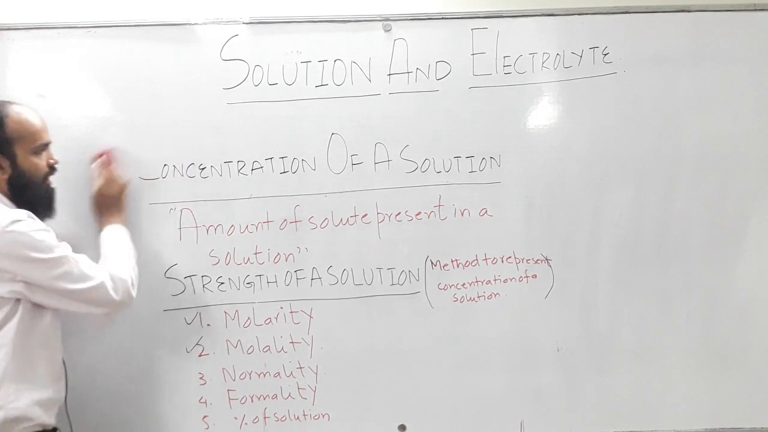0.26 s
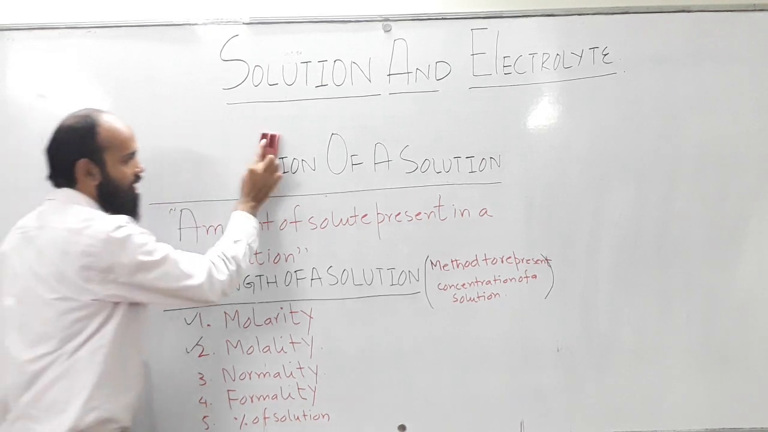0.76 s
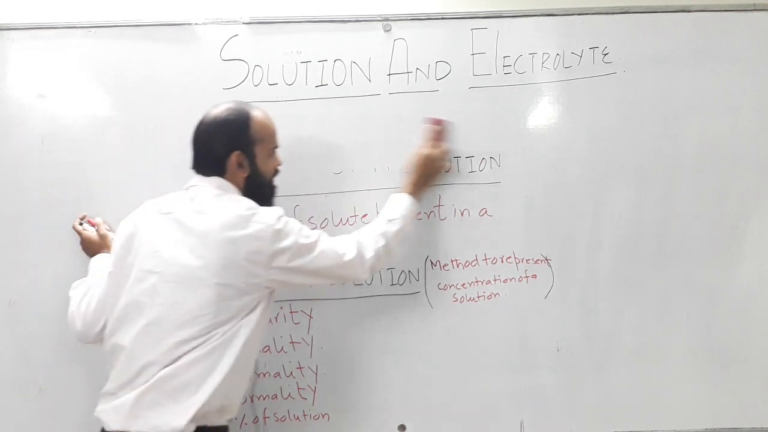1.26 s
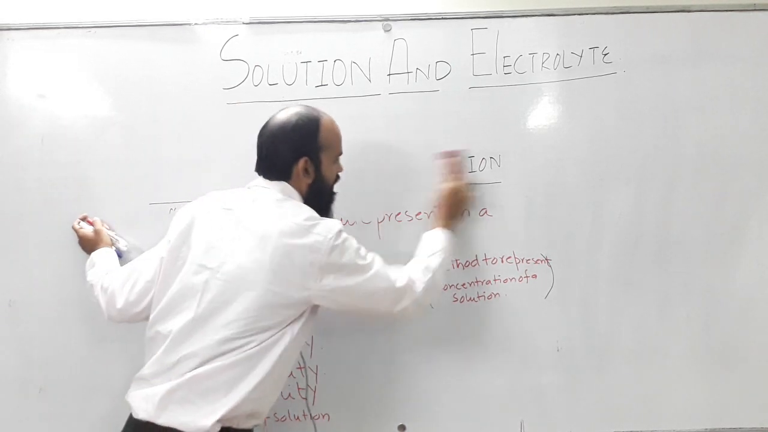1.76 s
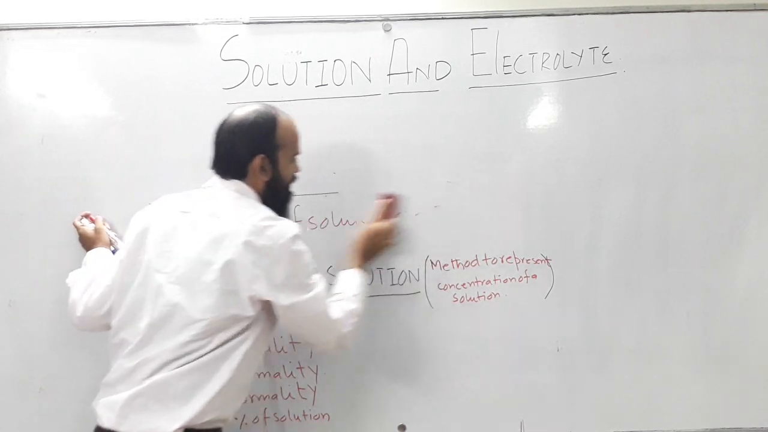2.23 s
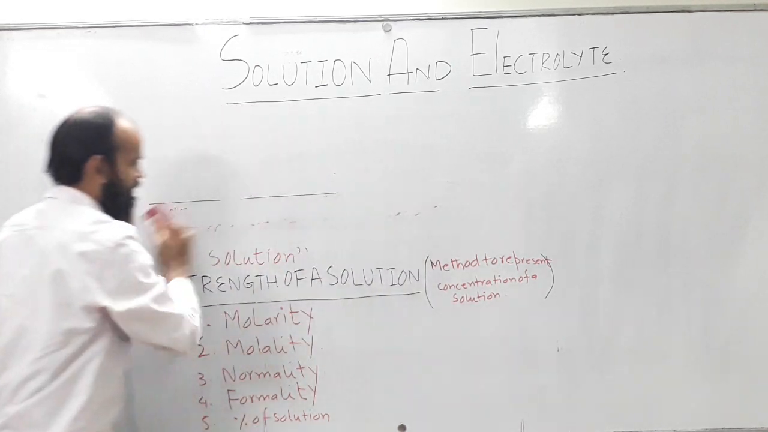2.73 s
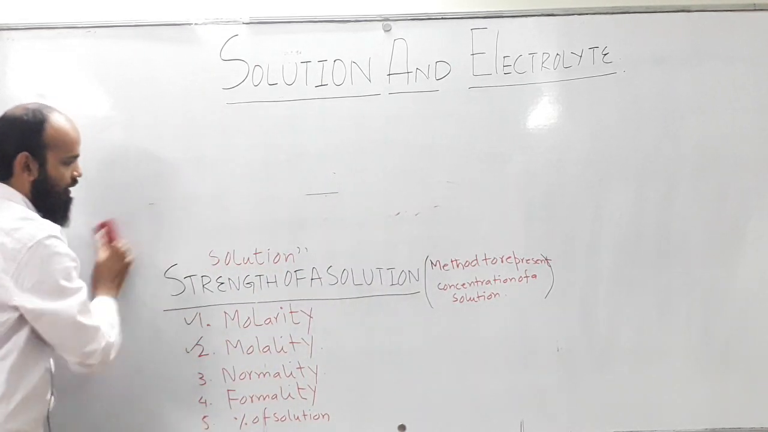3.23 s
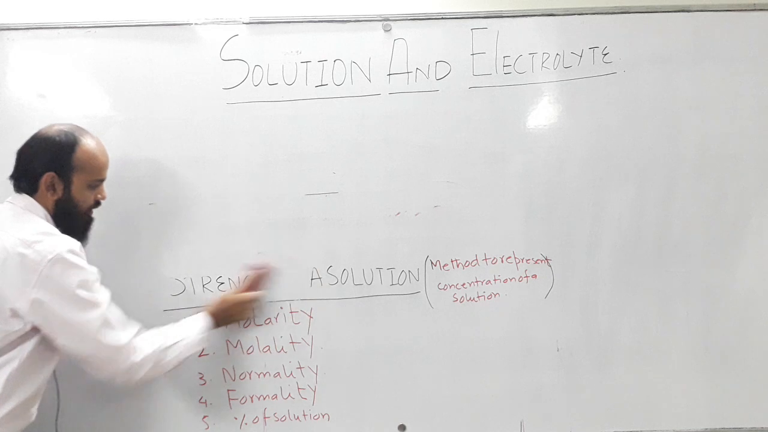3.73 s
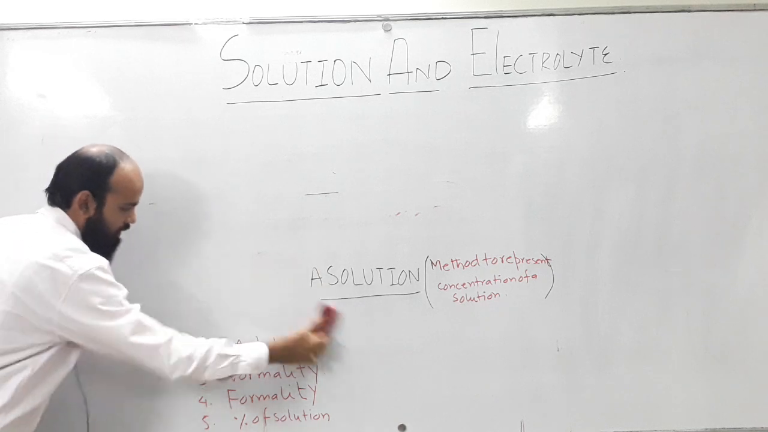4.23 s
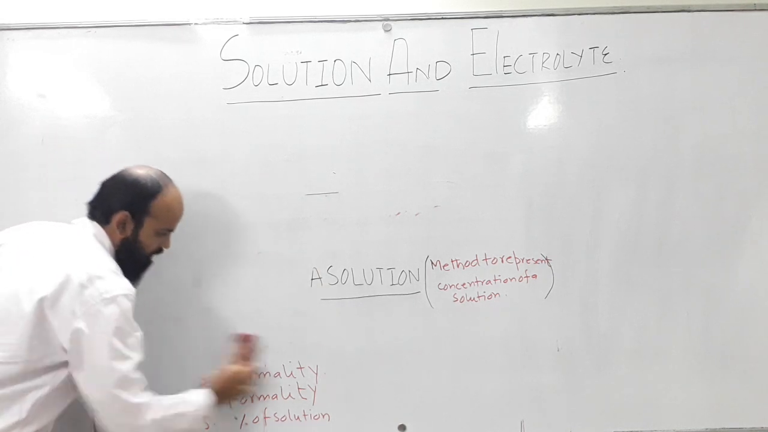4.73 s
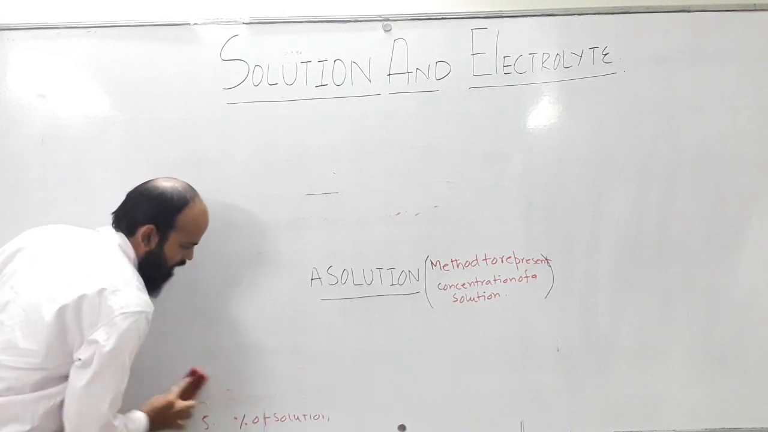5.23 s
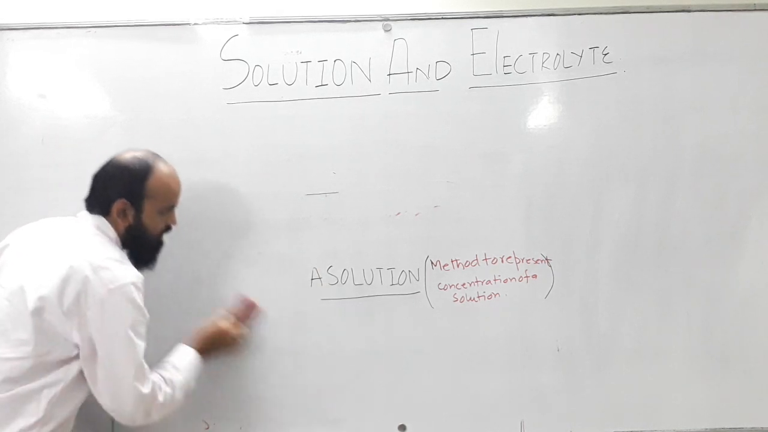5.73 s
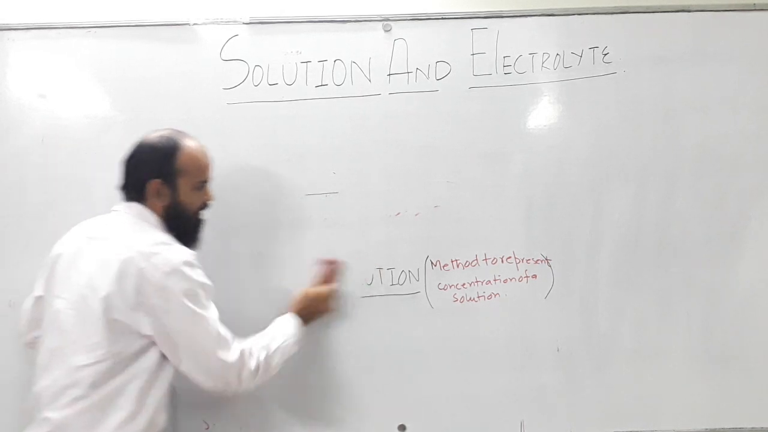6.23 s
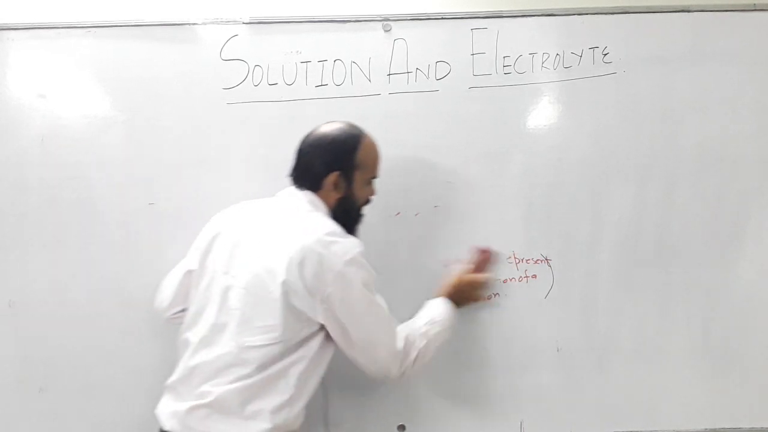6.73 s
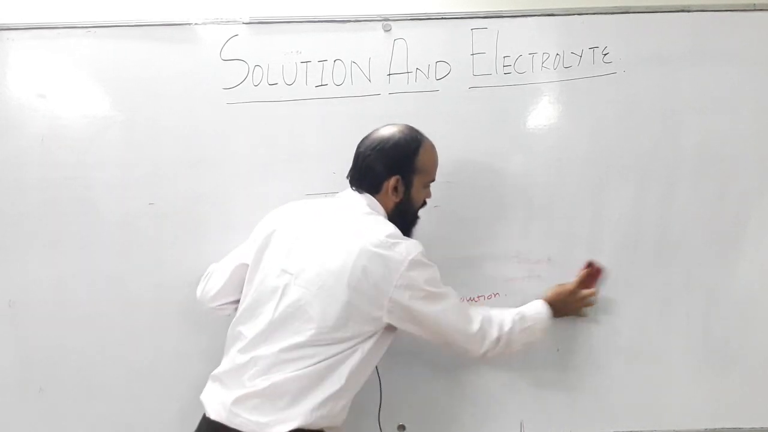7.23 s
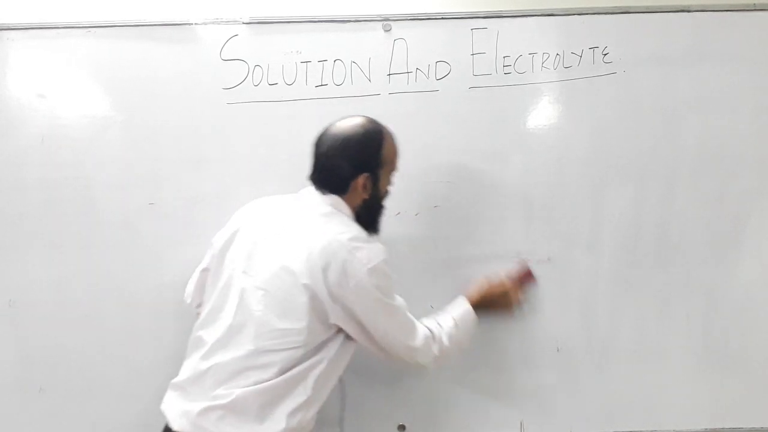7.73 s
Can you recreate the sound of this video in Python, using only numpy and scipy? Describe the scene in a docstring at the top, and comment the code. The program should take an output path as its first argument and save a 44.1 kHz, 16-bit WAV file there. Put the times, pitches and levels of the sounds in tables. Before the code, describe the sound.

A steady fan rush fills a classroom, low and fluttering, with a wavering motor hum and very thin electronic whine. From the start a felt eraser sweeps a whiteboard in rapid strokes of roughly 0.2 to 0.5 seconds, each a bright high hiss over a gentler mid scrub, nearly vanishing at turns. A dull thump lands at 1.9 s; a low drone passes around 2 to 3 s. At 3.1 s the plastic holder clicks sharply. Faint high squeaks flicker at 4.0 to 4.2 s, and a short rasp follows at 4.5 s. Wiping is vigorous around 4.5 to 5.5 s, with soft bumps near 5.2 s, a tick at 5.2 s and a clatter with scrape at 5.5 s. Another knock comes at 6.5 s, a rasp at 6.6 s and a lighter tick at 6.9 s. Strokes soften towards 8 s while the fans continue.

```python
"""A felt eraser is rubbed quickly to and fro over a whiteboard in a classroom where fans run.
Each stroke is shaped noise: a hiss that grows with the speed of the hand, over a gentler scrub.
The plastic holder ticks as a set of ringing modes and scrapes as short rasps of noise.
The felt squeaks faintly as wavering tones, and dull bumps come from the board and the microphone.
The fans are fluttering noise with a wavering hum and a passing drone; the electronics whine thinly."""
import sys
import numpy as np
from scipy import signal
from scipy.fft import rfft, irfft
from scipy.io import wavfile
from scipy.ndimage import uniform_filter1d

SR = 44100
rng = np.random.default_rng(int(sys.argv[2]) if len(sys.argv) > 2 else 0)


def master_out(mix):
    """Clip the mix to full scale and print it as 16-bit PCM to the path in sys.argv[1]."""
    frames = np.transpose(np.atleast_2d(mix))
    ceiling = np.clip(frames, -1, 1)
    pcm = np.round(ceiling * 32767).astype(np.int16)
    wavfile.write(sys.argv[1], SR, pcm)


N = 352112
TIME = np.arange(N) / SR  # seconds


def gain_of(db):
    """Turns decibels into a factor for the amplitude."""
    return 10 ** (np.asarray(db) / 20)


def evened(x):
    """Scales a sound to an rms of 1."""
    return x / np.sqrt(np.mean(x ** 2) + 1e-20)


def read(points, hz):
    """Reads a spectrum in dB, joined by straight lines over log frequency."""
    point_hz, db = np.transpose(points)
    return np.interp(np.log(hz + 1), np.log(point_hz), db)


def follow(rows, t):
    """Reads a level in dB at the times t, joined by straight lines."""
    seconds, db = np.transpose(rows)
    return np.interp(t, seconds, db)


def coloured(x, points, bands=()):
    """Gives x a spectrum, with a few narrow humps or hollows, at an rms of 1."""
    hz = np.fft.rfftfreq(N, 1 / SR)
    db = read(points, hz)
    for centre_hz, width_hz, lift_db in bands:
        db = db + lift_db * np.exp(-(2 * (hz - centre_hz) / width_hz) ** 2)
    return evened(irfft(rfft(x) * gain_of(db), N))


def wander(rate_hz):
    """Smooth chance with an rms of 1: noise kept mostly below rate_hz."""
    hz = np.fft.rfftfreq(N, 1 / SR)
    spectrum = rfft(rng.standard_normal(N))
    return evened(irfft(spectrum * np.exp(-(hz / rate_hz) ** 2), N))


def add(mix, s, sound):
    """Mixes a sound in at s seconds."""
    part = mix[max(round(s * SR), 0):][:len(sound)]
    part += sound[:len(part)]


def fibres(per_s, spread_db, share):
    """Countless tiny slips blur into noise; single snaps of fibres hold a share of its power."""
    size = gain_of(spread_db * np.minimum(rng.exponential(1, N), 4))
    happens = rng.random(N) < per_s / SR
    snaps = size * rng.standard_normal(N) * happens
    return np.sqrt(1 - share) * rng.standard_normal(N) + np.sqrt(share) * evened(snaps)


def whine():
    """Electronics sing faint, steady tones."""
    # Each row: pitch in Hz, rms level in dB.
    whine_tones = [(2154, -72.5), (2932, -73.5), (3650, -75.5), (5803, -79), (6523, -81), (6583, -78.5),
                   (7241, -74), (7300, -89), (8018, -74.5), (12387, -75), (13104, -79), (15258, -82)]
    out = np.zeros(N)
    for hz, db in whine_tones:
        out += gain_of(db) * np.sin(2 * np.pi * (hz * TIME + rng.random()))
    return np.sqrt(2) * out


def fans(rush_db=-0.71, split_hz=430, flutter_db=.5, waver=0.46, drift=0.96, drone_hz=80):
    """Blades churn the air into a fluttering rush; motor tones waver as the moving air carries them."""
    # The rush of air. Each row: frequency in Hz, relative level per Hz in dB.
    air_spectrum = [(20, -39), (50, -21.5), (70, -22), (100, -11.5), (125, -2.5), (300, -.5), (390, -6),
                    (650, -9.5), (880, -12.5), (1100, -13.5), (2000, -24.5), (3100, -31), (4800, -42),
                    (16000, -64)]
    # Bands the room lifts or hollows. Each row: middle in Hz, width in Hz, change in dB.
    room_bands = [(230, 22, -2), (292, 30, 2), (485, 37, -5.5), (571, 34, -3.5), (641, 25, 2.5)]
    # Level of the low rumble below split_hz, fans with the rubbed board, louder in hard wiping.
    # Each row: time in seconds, gain in dB before rush_db.
    rumble_levels = [(0, -37.5), (.7, -34.5), (1.9, -34.4), (2.8, -36.5), (4.05, -36), (4.75, -33.5),
                     (6.7, -36), (7.98, -37)]
    # Slow level of the airy roar above it. Each row: time in seconds, gain in dB before rush_db.
    roar_levels = [(0, -35), (1.5, -35), (3.5, -34.5), (4.0, -36), (6.3, -35.5), (7.98, -36)]
    # Motor tones. Each row: pitch in Hz, middle amplitude in dB, around which it wavers.
    motor_tones = [(54, -71), (80, -61.5), (122, -51.5), (143, -56.5), (161.5, -48.5), (200, -51),
                   (211, -48.5)]
    # A low drone comes and goes. Each row: time in seconds, rms level in dB.
    drone_levels = [(1.7, -74), (2.0, -60), (2.4, -54), (2.7, -55), (3.0, -74)]

    air = coloured(rng.standard_normal(N), air_spectrum, room_bands)
    air = air * gain_of(rush_db + flutter_db * wander(rate_hz=39))
    low_pass = signal.butter(4, split_hz, fs=SR, output="sos")
    rumble = signal.sosfiltfilt(low_pass, air)
    roar = air - rumble
    rush = gain_of(follow(rumble_levels, TIME)) * rumble + gain_of(follow(roar_levels, TIME)) * roar

    hum = np.zeros(N)
    for hz, db in motor_tones:
        swell = 1 + waver * wander(rate_hz=1.46)
        phase = 2 * np.pi * hz * TIME + drift * wander(rate_hz=2.2)  # drift in radians
        hum += gain_of(db) * swell * np.sin(phase)

    drone_tone = np.sqrt(2) * np.sin(2 * np.pi * drone_hz * TIME)
    return rush + hum + gain_of(follow(drone_levels, TIME)) * drone_tone


def bumps(looseness=0.2):
    """Soft, uneven pushes on board and microphone swing briefly, swelling and fading evenly."""
    # Each row: middle in seconds, rough peak in dB, pitch in Hz, length of each side in seconds.
    bump_rows = [(1.884, -22, 254, 0.022), (4.595, -43, 66, .05), (5.218, -36, 62, .05),
                 (5.242, -28, 171, 0.025), (6.495, -33, 480, .015)]
    out = np.zeros(N)
    for s, db, hz, length in bump_rows:
        envelope = np.exp(-abs(TIME - s) * 4 / length)
        swing = np.sin(2 * np.pi * hz * (TIME - s)) + looseness * wander(rate_hz=2 * hz)
        out += gain_of(db) * envelope * swing
    return out


def ticks(room_db=-13, room_t60=0.49, rise_s=0.00012):
    """Each tick rings those modes of the holder that its contact excites; the room answers softly."""
    # Each row: start in seconds, peak in dB, middle of the excited band in Hz, its spread in octaves.
    tick_rows = [(3.0927, -34, 9500, .7), (3.0964, -40, 9500, .7), (3.1011, -26.5, 4500, .28),
                 (3.1016, -24, 1780, .26), (5.1774, -28, 850, .5), (5.4714, -23, 1200, .35),
                 (5.4716, -34, 6600, .3), (5.4733, -26, 2700, .35), (5.4806, -35, 2400, .8),
                 (6.4930, -23, 2500, .55), (6.8778, -29, 1300, .1)]
    # Ways the plastic holder rings. Each row: pitch in Hz, relative level in dB,
    # time to fade by 60 dB in seconds.
    holder_modes = [(740, 5, 0.024), (1300, 5.5, 0.012), (1750, 8.5, 0.0067), (2120, 4, 0.0073),
                    (3200, 2.5, 0.0054), (4040, -8, 0.0079), (4740, -8, 0.0048), (6640, -5, 0.01),
                    (14100, -3, 0.0054)]
    out, t = np.zeros(N), np.arange(SR // 4) / SR
    for s, db, centre_hz, spread in tick_rows:
        ring = np.zeros(len(t))
        for hz, mode_db, t60 in holder_modes:
            excited = 1 / (1 + (np.log2(hz / centre_hz) / spread) ** 2)
            ring += excited * gain_of(mode_db - 60 * t / t60) * np.sin(2 * np.pi * hz * t)
        ring *= 1 - np.exp(-t / rise_s)
        add(out, s, gain_of(db) * ring / abs(ring).max())
    # the room's answer is a fading burst of noise
    tail = rng.standard_normal(len(t)) * gain_of(-60 * t / room_t60)
    echo = signal.fftconvolve(out, tail / np.linalg.norm(tail))[:N]
    return out + gain_of(room_db) * echo


def scrapes(width_octaves=0.36):
    """The holder's hard edge catches in quick small slips, heard as a short rasp in one band."""
    # Each row: middle in seconds, rms level at the middle in dB, length in seconds, pitch in Hz.
    scrape_rows = [(4.495, -56, .06, 2700), (5.147, -56, .07, 2600), (5.486, -49.5, .07, 2600),
                   (6.623, -52.5, 0.14, 1850)]
    out, hz = np.zeros(N), np.fft.rfftfreq(N, 1 / SR)
    slips = rfft(fibres(per_s=500, spread_db=5.5, share=.5))
    for s, db, length, centre_hz in scrape_rows:
        octaves_away = np.log2((hz + 1) / centre_hz)
        rasp = irfft(slips / (1 + (2 * octaves_away / width_octaves) ** 2), N)
        out += gain_of(db) * evened(rasp) * np.exp(-(2 * (TIME - s) / length) ** 2)
    return out


def squeaks(pitch_hz=3120, waver=.003):
    """The felt briefly sticks and slips around one pitch."""
    # Each row: middle in seconds, rms level at the middle in dB, length in seconds.
    squeak_rows = [(4.0, -59, .06), (4.105, -58, 0.045), (4.195, -59, .04)]
    out = np.zeros(N)
    wavering_hz = pitch_hz * (1 + waver * wander(rate_hz=74))
    tone = np.sqrt(2) * np.sin(2 * np.pi * np.cumsum(wavering_hz) / SR)
    for s, db, length in squeak_rows:
        out += gain_of(db) * tone * np.exp(-(2 * (TIME - s) / length) ** 2)
    return out


def hand(t, speed_power=3.33, turn_db=-63.5):
    """Each stroke speeds up and slows along a sine arch; gives hiss level, brightness, lift, pressure."""
    # Each row: start in seconds, length in seconds, share of it spent speeding up,
    # hiss level at full speed in dB before the eraser's trim, brightness in dB per octave,
    # lift of the hiss resonance against the rest in dB, pressure as extra dB of the scrub.
    stroke_rows = [(-0.22, 0.45, 0.2, -46, 0, -2, 4), (0.143, 0.27, 0.5, -49, 0.5, -0.5, -4),
                   (0.345, 0.51, 0.7, -49, -0.5, -2.5, 2), (0.801, 0.18, 0.53, -52.5, 2, -2, 1),
                   (0.93, 0.39, 0.42, -46.5, 0, -2, 1.5), (1.11, 0.34, 0.52, -50.2, -3, 0, 1),
                   (1.417, 0.227, 0.62, -48, 2, -1, 0.5), (1.609, 0.404, 0.42, -46.7, -1, -1, 0),
                   (1.903, 0.82, 0.78, -48.5, 0.5, 0.5, 0), (2.707, 0.4, 0.42, -48.1, -3, 1.5, -6),
                   (2.973, 0.39, 0.63, -48, 1, -2, 1), (3.296, 0.48, 0.38, -48.2, -1, 1.5, 0),
                   (3.687, 0.3, 0.61, -48.5, 0.5, -1.5, 1.5), (3.945, 0.42, 0.44, -47.5, -1.5, 2.5, 0),
                   (4.344, 0.291, 0.54, -47.5, 0, 0, -1), (4.573, 0.45, 0.58, -46, -1, 0.5, -0.5),
                   (4.974, 0.31, 0.59, -47, 0.5, 0, -1), (5.238, 0.46, 0.4, -47, -1, -1, 0.5),
                   (5.582, 0.34, 0.43, -48.0, 1.5, 1.5, 1), (5.877, 0.35, 0.48, -49.5, -1, 0.5, -3),
                   (6.219, 0.22, 0.42, -53, 0, 0, 1), (6.334, 0.44, 0.46, -46.5, -1, 2, 1),
                   (6.716, 0.2, 0.66, -50.6, 0.5, -2, 1.5), (6.844, 0.45, 0.58, -48, -1, 2, 0),
                   (7.248, 0.26, 0.64, -50, 1, -2, 2), (7.464, 0.23, 0.55, -52, -1, 0, 1),
                   (7.646, 0.44, 0.42, -54.1, 1, -1, 2.5)]
    # the hand curves round each turn and never quite stops, so a little hiss is left
    power = gain_of(turn_db) ** 2
    fastest = []
    for start, length, rise, db, *_ in stroke_rows:
        peak = start + length * rise
        fastest.append(peak)
        speed = np.sin(np.pi / 2 * np.interp(t, [start, peak, start + length], [0, 1, 0]))
        power = power + gain_of(db) ** 2 * speed ** speed_power
    # the lie of the pad eases from one stroke's grip to the next
    grip = [np.interp(t, fastest, column) for column in np.transpose(stroke_rows)[4:]]
    return 10 * np.log10(power), *grip


def eraser(judder_db=0.55, patchy_db=1.06, hiss_db=0.57, scrub_db=-54.0, scrub_growth=0.69,
           ring_hz=10500, ring_width_hz=2600, window=512):
    """Felt hisses with the hand's speed and falls quiet at every turn; the scrub follows more gently."""
    # Felt sliding on the glossy board. Each row: frequency in Hz, relative level per Hz in dB.
    hiss_spectrum = [(1500, -26), (3500, -18), (5200, -15), (6800, -8), (8000, -6.5), (9200, -2.5),
                     (10100, 0), (11200, 0), (13000, -5.5), (14500, -7), (16000, -12)]
    # The surface scrubbed under the pad. Each row: frequency in Hz, relative level per Hz in dB.
    scrub_spectrum = [(200, -22), (700, -3), (1400, -3), (2800, -0.5), (4200, -9.5), (7000, -11.5),
                      (12000, -27)]

    slips = fibres(per_s=5000, spread_db=-1, share=0.13)
    # cut the hiss into short moments, each with its own spectrum
    hz, t, z = signal.stft(coloured(slips, hiss_spectrum), SR, nperseg=window)
    stroke_db, brightness, lift_db, pressure_db = hand(t)
    speed_db = np.interp(TIME, t, stroke_db) + judder_db * wander(rate_hz=24)

    # the lie of the pad tips the hiss and sharpens or flattens its resonance
    octaves = np.log2(np.maximum(hz, 4000) / ring_hz)[:, None]
    resonance = np.exp(-(2 * (hz - ring_hz) / ring_width_hz) ** 2)[:, None] - .5
    # ink and bare board pass under the felt in patches
    patches = uniform_filter1d(rng.standard_normal(z.shape), size=12, axis=0)
    patches = evened(uniform_filter1d(patches, size=16, axis=1))
    z = z * gain_of(octaves * brightness + resonance * lift_db + patchy_db * patches)
    hiss = signal.istft(z, SR, nperseg=window)[1][:N]

    scrub = coloured(fibres(per_s=900, spread_db=2.5, share=0.4), scrub_spectrum)
    below_fastest_db = speed_db - stroke_db.max()
    pressed_db = scrub_db + np.interp(TIME, t, pressure_db)
    scrub = scrub * gain_of(pressed_db + scrub_growth * below_fastest_db)
    return gain_of(speed_db + hiss_db) * hiss + scrub


def scene():
    """Everything adds up at one microphone."""
    return (whine() + fans() + bumps() + ticks() + scrapes() + squeaks() + eraser())[None]


def record(dry, edge_hz=15780):
    """The recorder steeply cuts off everything above edge_hz."""
    low_pass = signal.firwin(1023, edge_hz, window=("kaiser", 9), fs=SR)
    return signal.oaconvolve(dry, low_pass[None], "same")


dry = scene()
out = record(dry)
master_out(out)
```